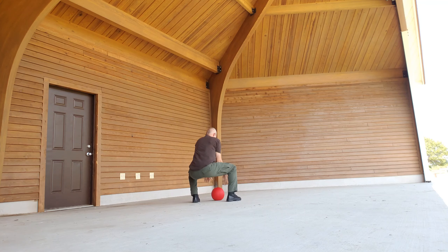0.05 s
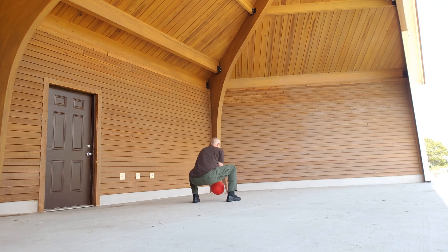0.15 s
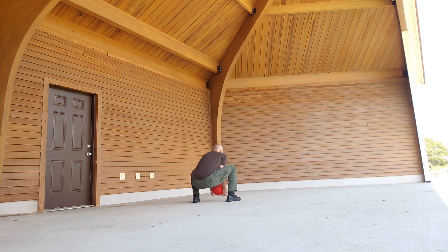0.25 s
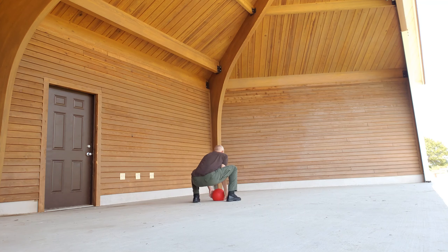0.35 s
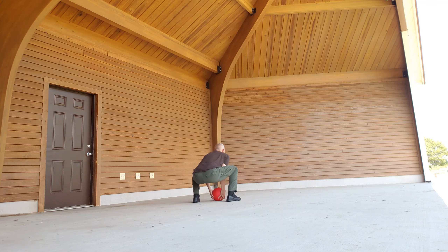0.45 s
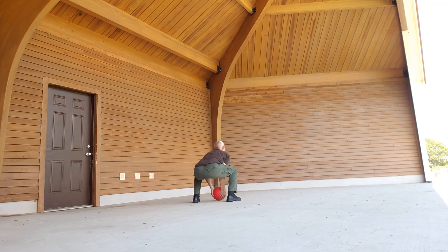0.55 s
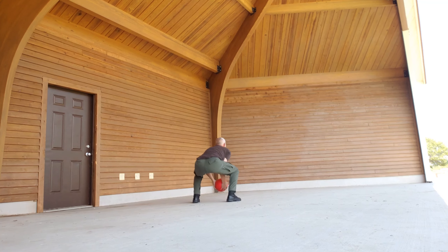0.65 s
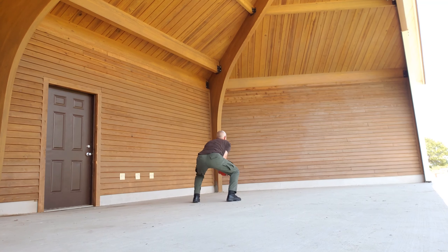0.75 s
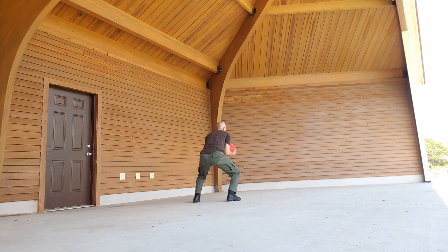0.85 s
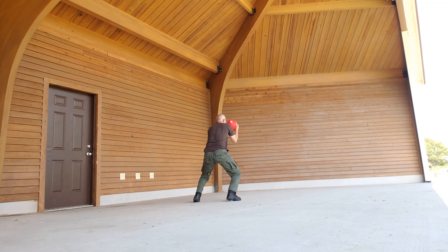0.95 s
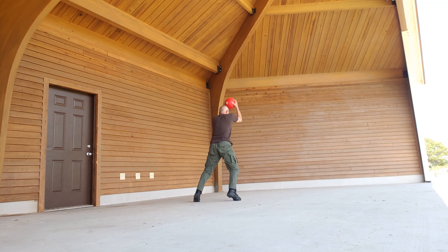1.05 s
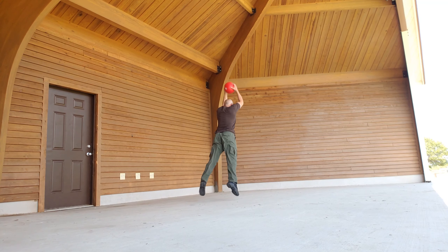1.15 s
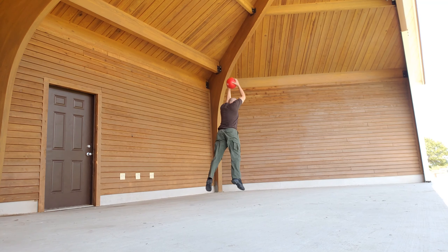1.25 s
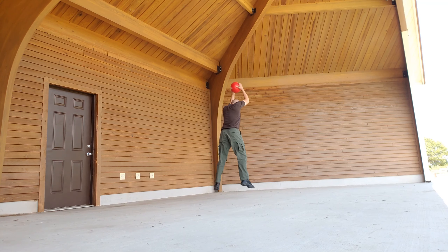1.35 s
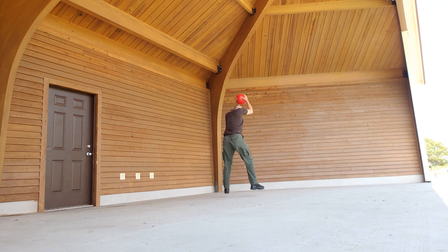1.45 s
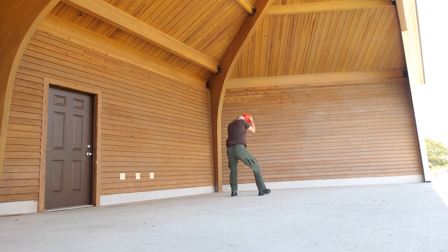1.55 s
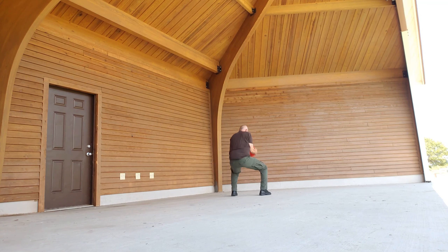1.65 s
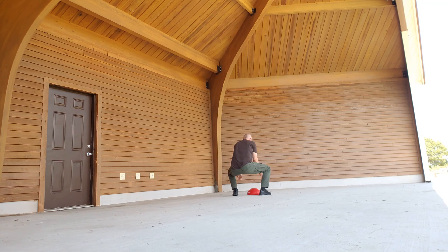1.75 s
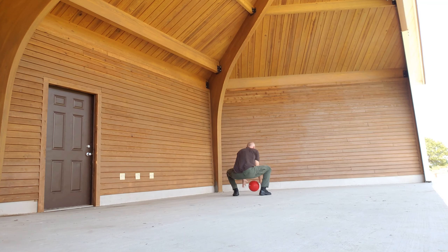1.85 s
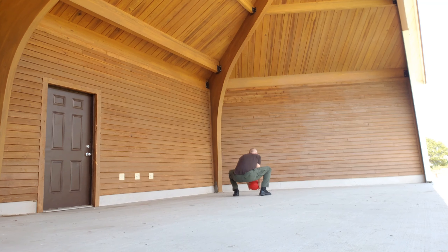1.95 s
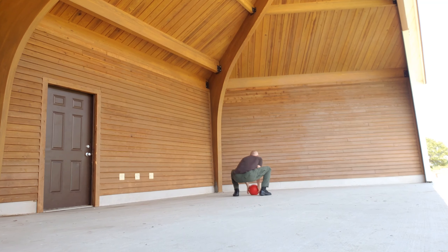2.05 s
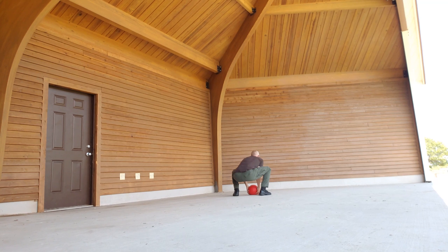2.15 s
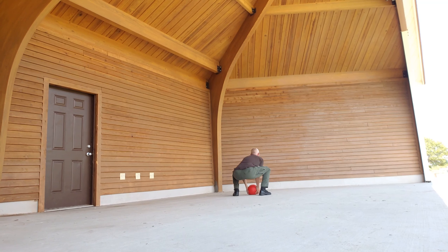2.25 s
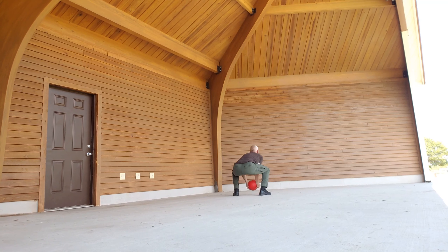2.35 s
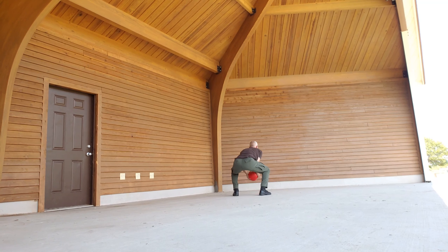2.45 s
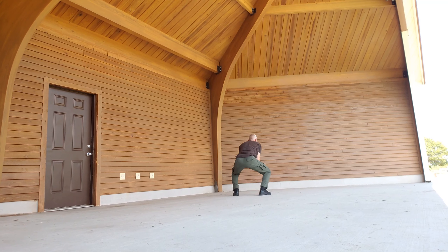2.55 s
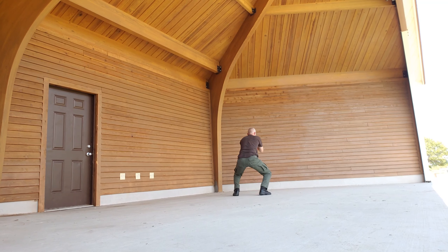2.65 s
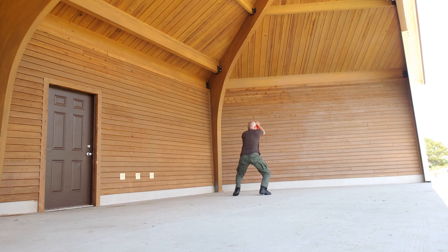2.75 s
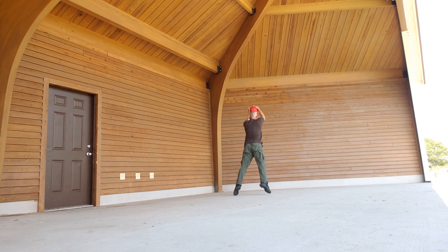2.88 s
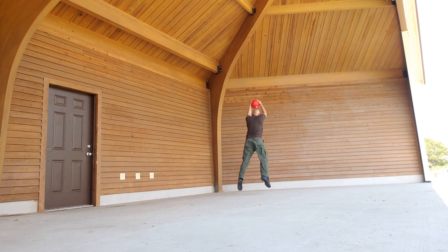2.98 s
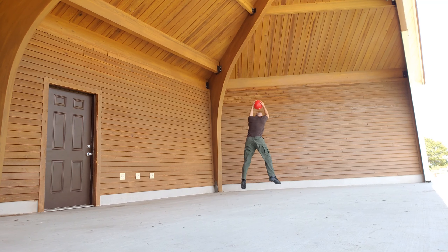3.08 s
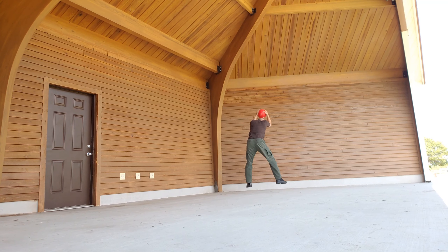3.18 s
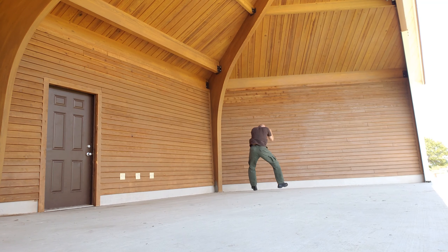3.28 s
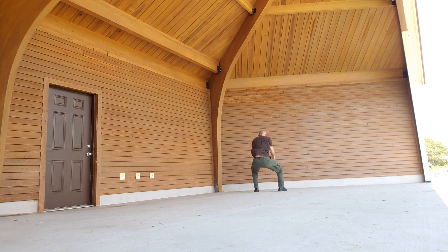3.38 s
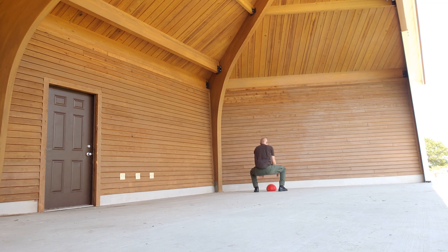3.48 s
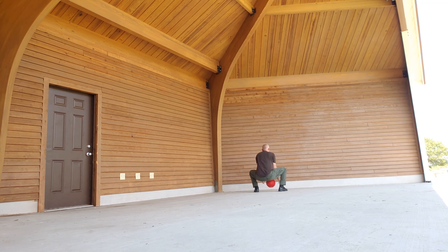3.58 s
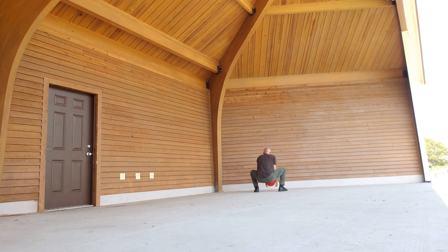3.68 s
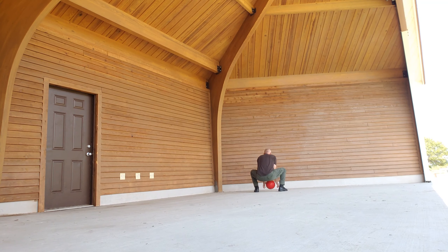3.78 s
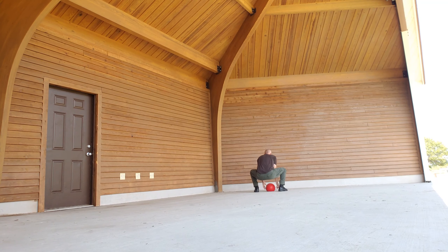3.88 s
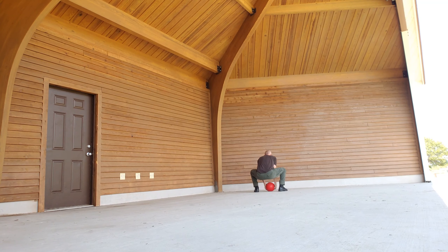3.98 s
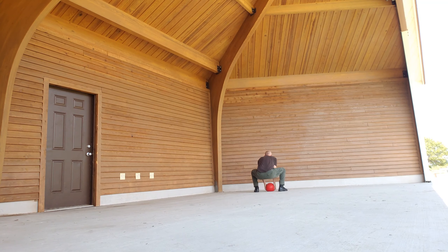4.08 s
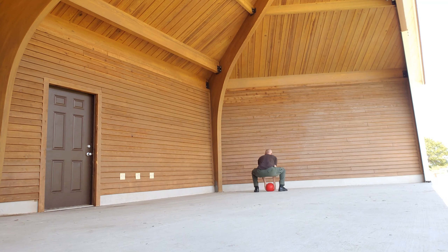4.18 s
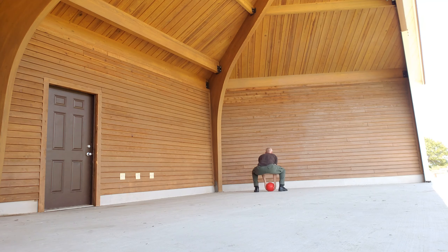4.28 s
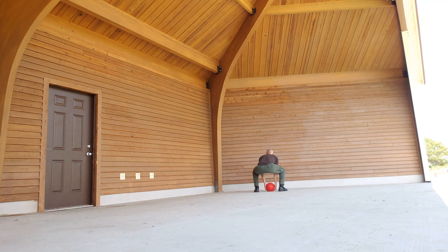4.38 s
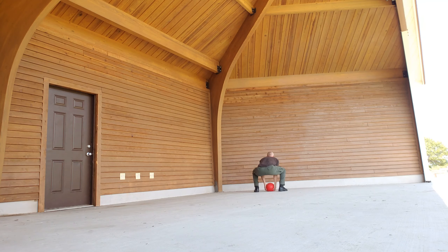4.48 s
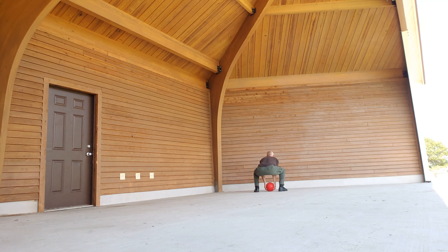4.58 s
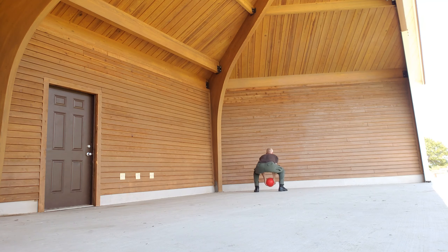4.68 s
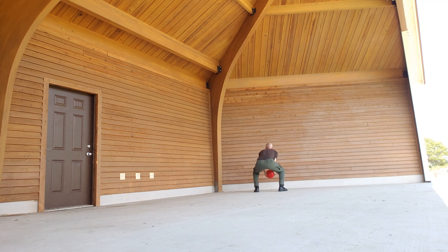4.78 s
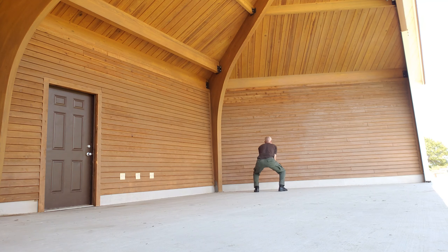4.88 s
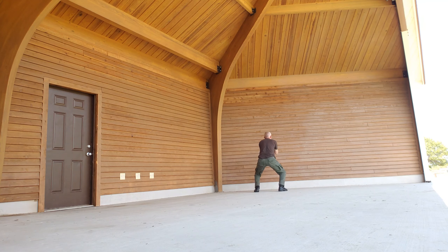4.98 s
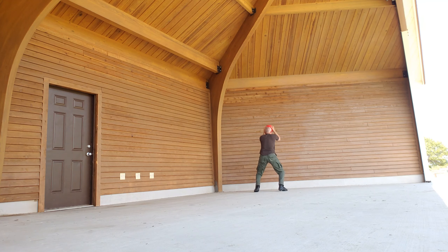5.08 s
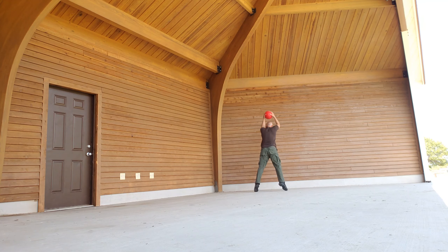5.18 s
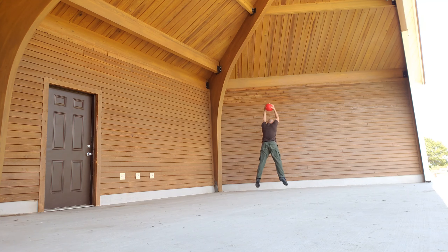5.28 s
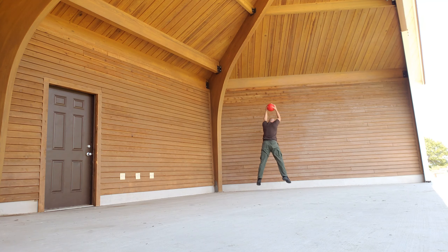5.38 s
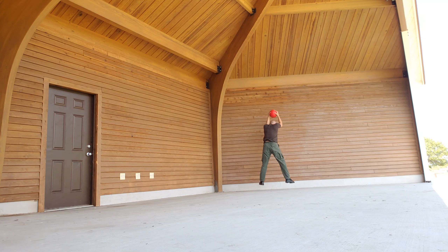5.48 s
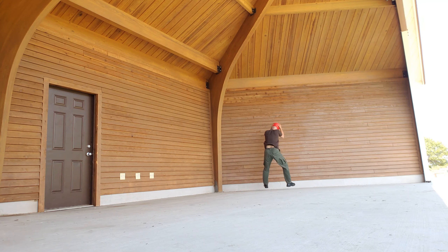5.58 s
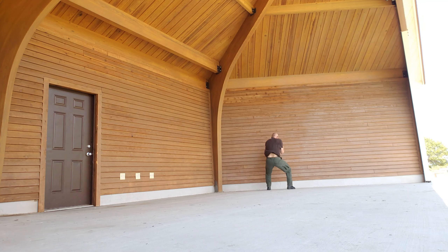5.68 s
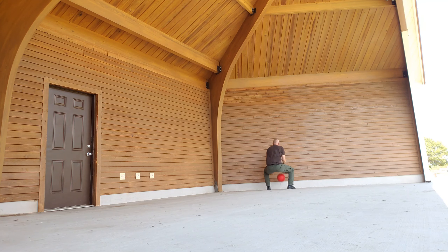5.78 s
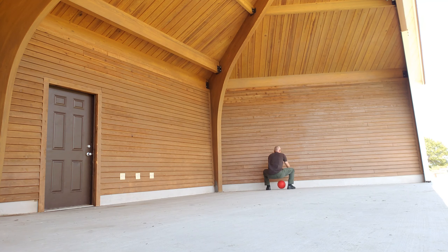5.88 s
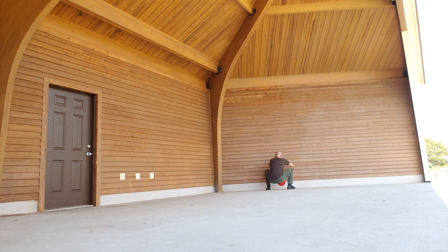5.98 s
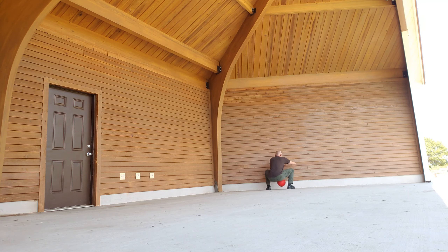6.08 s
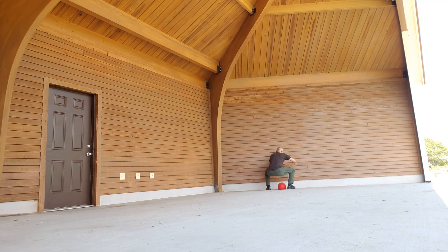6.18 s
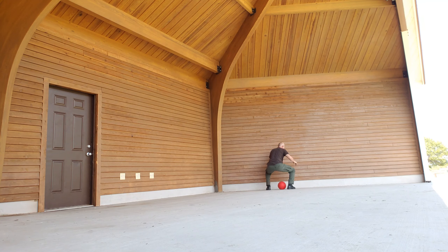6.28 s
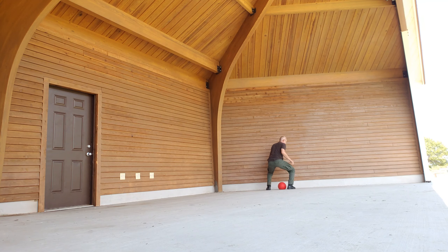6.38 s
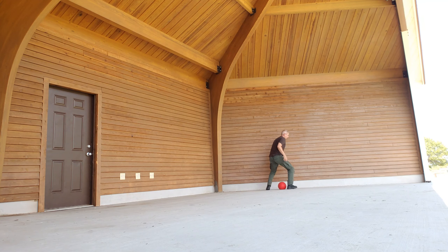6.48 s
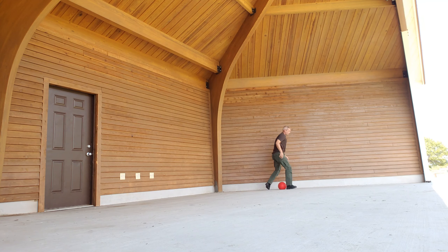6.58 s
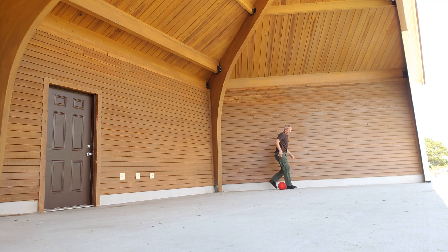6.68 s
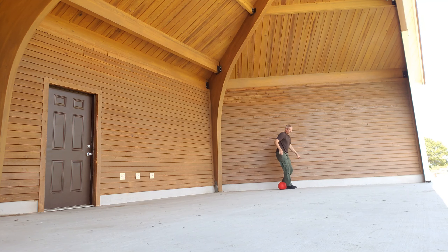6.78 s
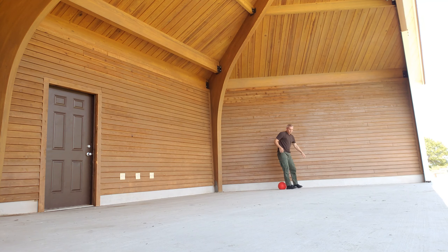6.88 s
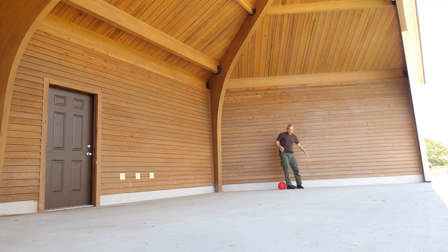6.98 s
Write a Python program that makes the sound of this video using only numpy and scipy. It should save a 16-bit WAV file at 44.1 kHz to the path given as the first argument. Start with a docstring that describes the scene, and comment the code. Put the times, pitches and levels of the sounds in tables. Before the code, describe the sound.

A heavy sand-filled ball is slammed onto concrete four times, with boots landing from jumps, echoing briefly in an open pavilion.

```python
"""A sand-filled ball is slammed four times on the concrete slab of an open wooden pavilion by someone
jumping in boots. Each blow reaches a listening point on the same slab first as a falling chirp of bending
waves in the concrete, then through the air, then by reflection from the walls and roof. The ball drops
back, soles and cloth rub and the sand runs. Behind are faint short chirps, perhaps distant birds, the
rumble of far traffic and the hiss of insects."""
import sys
import numpy as np
from scipy import signal
from scipy.fft import rfft, irfft, next_fast_len
from scipy.io import wavfile
from scipy.ndimage import map_coordinates

SR = 44100
rng = np.random.default_rng(int(sys.argv[2]) if len(sys.argv) > 2 else 0)


def master_out(mix):
    """Clip the mix to full scale and print it as 16-bit PCM to the path in sys.argv[1]."""
    frames = np.transpose(np.atleast_2d(mix))
    ceiling = np.clip(frames, -1, 1)
    pcm = np.round(ceiling * 32767).astype(np.int16)
    wavfile.write(sys.argv[1], SR, pcm)


N = 310419

# ball caught, or dropping back from its low bounce: start_s, level_db, treble_db, knock_hz
DROPS = [(.421, -30.5, -1, 2726), (1.995, -24, 4, 2874), (2.139, -20.5, -9, 870),
         (3.917, -30.5, -5.5, 2880), (6.254, -27.5, -2, 2320)]


def slams():
    """Impact excitation: the ball radiates a smack and sets the air under the roof and the slab ringing."""
    # airborne_arrival_s, level_db, bass_db, treble_db, corner_echo_db, distance_m
    hits = [(0.0888, 8.5, -6.5, -0.5, -4, 6.3), (1.832, 7.5, -6, 0, -1, 7.4), (3.5503, 9, -5.5, -4.5, 9, 6),
            (5.9088, 3, -9.5, 2, 11.5, 9.4)]
    # ball on concrete: frequency_hz, density_db
    spectrum = [(15, -41.5), (25, -12), (64, 1.5), (170, -6), (256, -15), (309, -18), (818, -28),
                (1040, -32.5), (2000, -32), (2410, -35.5), (2840, -35.5), (8830, -38.5), (11900, -34.5),
                (16000, -44.5)]
    sound_m_per_s = 343
    out = np.zeros((2, N))
    for s, db, bass_db, treble_db, corner_db, metres in hits:
        add(out, s, blow(spectrum, db, bass_db, treble_db, knock_hz=1980, knock_db=2.5,
                         contact_s=.0005, direct_db=3, corner_db=corner_db))
        add(out, s, air_modes(db + bass_db - 18.5))
        add(out, s - metres / sound_m_per_s, slab_wave(db + 16, metres))
    return out


def blow(spectrum, db, bass_db, treble_db, knock_hz, knock_db, contact_s,
         rise_s=1 / SR, direct_db=0, corner_db=0):
    """Contact gives a pressure pulse and a puff of air and grit; ribbed walls scatter each echo anew."""
    # early reflections: delay_s, level_db, left_minus_right_db
    walls = [(.0024, -4, 3.5), (.009, -6, -2), (0.011, -6, 2.5), (0.019, -5, 1.5), (0.026, -10, -4.5)]
    heard = pavilion(corner_db)
    t = np.arange(SR // 10) / SR
    for delay, path_db, pan_db in [(0.00024, direct_db, 0.0031)] + walls:
        puff = rng.standard_normal((2, len(t))) * np.exp(-t / contact_s)
        puff = signal.lfilter([1, -1], [1, -.95], puff / np.linalg.norm(puff[0]))  # high-pass
        puff[:, 0] += .6  # the pulse
        add(heard, delay, amp(path_db + pan_db * np.array([[.5], [-.5]])) * puff)
    heard *= 1 - np.exp(-(1 + np.arange(heard.shape[1])) / SR / rise_s)  # a soft contact fades in
    tilt = [(120, bass_db), (700, 0.005), (6000, treble_db)]
    knock = lambda hz: knock_db * np.exp(-(np.log((hz + 1) / knock_hz) / .16) ** 2)  # hollow rubber note
    colour = minimum_phase(lambda hz: along(spectrum, hz) + along(tilt, hz) + knock(hz))
    return amp(db) * signal.fftconvolve(heard, colour[None], axes=1)


def slab_wave(db, metres):
    """Dispersion: bending waves travel as the root of frequency, so a blow arrives as a falling chirp."""
    # transmission through the concrete: frequency_hz, gain_db
    slab = [(20, -16.5), (60, 5), (200, 4), (450, -4.5), (800, -20.5), (1500, -60.5), (3000, -120)]
    speed_at_1_hz = 13  # phase speed, m/s
    kick = np.zeros(SR // 4)
    kick[0] = amp(db)
    path = lambda hz, m: np.exp(-2j * np.pi * m * np.sqrt(hz) / speed_at_1_hz)
    edge_echo = lambda hz: -1.2 * path(hz, 1.3 * metres)
    return filtered(kick, lambda hz: amp(along(slab, hz)) * (path(hz, metres) + edge_echo(hz)))


def air_modes(db):
    """Normal modes: the air under the roof booms in damped sines whose strengths vary with each blow."""
    # frequency_hz, level_db, t60_s
    modes = [(59.4, -5, 0.63), (75.5, -3, 0.073), (112, 1, 0.23), (137, -5.5, 0.3), (255, -5, 0.19)]
    t = np.arange(SR // 2) / SR
    drive_db = lambda hz: along([(60, -2), (110, 0.0065)], hz) + rng.normal(0, 1.1)
    ring = sum(amp(level + drive_db(hz) - 60 * t / t60) * np.sin(2 * np.pi * hz * t)
               for hz, level, t60 in modes)
    return -amp(db) * ring * (1 - np.exp(-t / 0.0036))


def pavilion(corner_db, wet_db=9, build_s=0.0082, corner_s=0.018):
    """Reverberation builds up and decays band by band; the corner behind the player boosts its start."""
    # decay under the roof: frequency_hz, t60_s
    roof = [(50, 0.36), (120, 0.37), (400, 0.35), (1500, 0.3), (5000, 0.28), (12000, 0.26)]
    hz, t, bands = signal.stft(noise_pair(SR // 2), SR, nperseg=256)
    tail = signal.istft(bands * amp(-60 * t / along(roof, hz)[:, None]), SR, nperseg=256)[1]
    open_side = lambda hz: amp(along([(100, -3.0), (400, -2.5)], hz))  # long waves escape
    tail = filtered(tail, open_side)
    t = np.arange(tail.shape[1]) / SR
    tail *= amp(wet_db) * (1 - np.exp(-t / build_s)) / np.linalg.norm(tail[0])
    return tail * (1 + amp(corner_db) * np.exp(-(t / corner_s) ** 2))


def boots():
    """Impact of toe, then heel, after each jump: the slower the landing, the longer the contact."""
    # start_s, level_db, treble_db, rise_s
    landings = [(.001, -7, 7.5, 0.00042), (1.603, -24.5, -14, 0.002), (1.631, -4.5, -6, .0005),
                (3.419, -17.5, -12, 0.0081), (3.434, 0.5, -4.5, 0.0023), (3.444, -2.5, 0, 0.0011),
                (5.731, -16, -6.5, 0.006), (5.755, -1, -4.5, 0.0011)]
    # sole on concrete: frequency_hz, density_db
    spectrum = [(24, -34), (40, -9.5), (127, -5), (402, -15), (715, -13), (1300, -22.5), (1590, -20.5),
                (1950, -23.5), (2700, -25.5), (4930, -39.5), (16000, -53)]
    out = np.zeros((2, N))
    for s, db, treble_db, rise_s in landings:
        add(out, s, blow(spectrum, db, bass_db=-2, treble_db=treble_db, knock_hz=1680, knock_db=3,
                         contact_s=0.0017 + 0.7 * rise_s, rise_s=rise_s, corner_db=3.5))
    return out


def drops():
    """Soft impact: the ball, caught or dropping back, makes a long contact with a hollow resonance."""
    # frequency_hz, density_db
    spectrum = [(88, -38), (150, -9), (466, -8), (555, -14), (689, -13.5), (871, -14), (1600, -17.5),
                (11300, -28), (16000, -37)]
    out = np.zeros((2, N))
    for s, db, treble_db, knock_hz in DROPS:
        add(out, s, blow(spectrum, db, bass_db=-2.5, treble_db=treble_db, knock_hz=knock_hz,
                         knock_db=3.5, contact_s=.01, rise_s=0.0028, corner_db=-6.5))
    return out


def rubbing():
    """Sliding friction: soles and cloth make bright and dull noise that flutters as the grip slips."""
    # peak_s, level_db, dull_part_db, rise_s
    scuffs = [(1.101, -72.5, 1.5, 0.039), (1.171, -71, 2, 0.026), (1.29, -78, 12.5, 0.04),
              (1.985, -57, -10, 0.03), (2.732, -72, -25, 0.03), (2.827, -68.5, -18.5, .015),
              (2.891, -55, -17, 0.027), (2.971, -65.5, 1, 0.035), (3.988, -71.5, 5, 0.045),
              (4.78, -78, -4, 0.033), (5.26, -67, -3, 0.033), (5.34, -77.5, -14, 0.019),
              (6.58, -73, 8, 0.041), (6.635, -57.5, -1, 0.025), (7.03, -70.5, 17.5, 0.008)]
    # soles sliding on after a landing: peak_s, level_db
    slides = [(1.65, -59), (3.46, -54), (5.768, -55)]
    # bright and dull friction spectra: frequency_hz, density_db
    rub = [(290, -38), (500, -10.5), (1190, -15.5), (1950, -15.5), (2810, -16.5), (4800, -18.5),
           (14700, -16), (16000, -15)]
    leather = [(200, 5), (450, 9.5), (900, 5.5), (1500, -11), (2200, -14), (4000, -58.5)]
    slide_dull_db = -4
    strokes = [(amp(db) * swell(s, rise, 1.1 * rise), dull_db) for s, db, dull_db, rise in scuffs]
    strokes += [(amp(db) * swell(s, rise_s=.015, fall_s=0.1), slide_dull_db) for s, db in slides]
    bright = sum(stroke for stroke, _ in strokes)
    dull = sum(amp(dull_db) * stroke for stroke, dull_db in strokes)
    flutter = amp(0.6 * wobble(80))
    return flutter * (bright * noise(rub) + dull * noise(leather))


def sand():
    """Granular flow: the filling hisses as it shifts in the ball and as it settles after every drop."""
    # ball swung, bouncing or lifted: peak_s, level_db, rise_s
    shifts = [(0.3, -61, 0.054), (.62, -67.5, 0.18), (1.791, -60.5, 0.05), (2.38, -66, .13),
              (3.748, -71, 0.06), (5.874, -49.5, 0.022), (6.1, -68, .035)]
    # colliding grains: frequency_hz, density_db
    grit = [(3000, -38), (5500, -8.5), (7500, -6.5), (11000, -3), (16000, -1)]
    moving = sum(amp(db) * swell(s, rise, 0.83 * rise) for s, db, rise in shifts)
    settling = sum(amp(db - 32) * swell(s + .025, rise_s=.022, fall_s=.0374) for s, db, *_ in DROPS)
    return (moving + settling) * noise(grit)


def faint_chirps():
    """Random amplitude modulation spreads each short tone, perhaps a distant bird, into a narrow band."""
    # peak_s, pitch_hz, level_db
    tones = [(1.2, 479, -57), (1.28, 1780, -73), (1.29, 499, -65), (2.895, 2750, -63), (3.981, 1400, -60),
             (4.083, 1560, -71.5), (4.467, 1402, -80), (4.71, 1480, -77), (5.27, 2780, -74.5),
             (6.605, 1270, -59.5)]
    t = np.arange(N) / SR
    out = np.zeros((2, N))
    for s, hz, db in tones:
        envelope = amp(db) * swell(s, rise_s=0.034, fall_s=0.032)
        fuzz = np.array([wobble(470), wobble(300)])
        out += envelope * np.sin(2 * np.pi * hz * t) * fuzz
    return out


def traffic():
    """Slowly modulated low-frequency noise: far traffic rumbles in lumps beneath a weaker drone."""
    # time_s, rumble_db, drone_db
    levels = [(0, -49.5, -57.5), (1.2, -48.5, -61.5), (3.3, -48, -59.5), (4.899, -49.5, -64.5),
              (5.7, -50.5, -62.5), (6.2, -44.5, -60.5), (7.04, -47, -59.5)]
    # both spectra: frequency_hz, density_db
    rumble_spectrum = [(12, -62), (20, -27.5), (46, 1.5), (70, 1.5), (130, -8.5), (162, -27), (250, -24.5),
                       (320, -38.5), (550, -120)]
    drone_spectrum = [(88, -43.5), (150, -8.5), (240, -9), (300, -18), (646, -30), (1420, -39.5),
                      (2500, -53), (3250, -83), (5500, -120)]
    s, rumble_db, drone_db = np.transpose(levels)
    t = np.arange(N) / SR
    rumble = amp(np.interp(t, s, rumble_db) + 1.5 * wobble(7)) * noise(rumble_spectrum)
    drone = amp(np.interp(t, s, drone_db) + 0.27 * wobble(9)) * noise(drone_spectrum)
    return rumble + drone


def insects():
    """Narrow-band noise: the hiss of far insects near 7.5 kHz comes and goes."""
    # time_s, level_db
    levels = [(0, -91.5), (0.9, -86.5), (1.4, -94), (2.4, -85.5), (3.201, -85), (4.45, -95), (4.75, -84),
              (5, -99.5), (5.3, -82), (5.6, -95), (7.04, -96.5)]
    # frequency_hz, density_db
    wings = [(5000, -58), (6500, -8), (7500, 1.5), (8300, -11), (10000, -61.5)]
    s, db = np.transpose(levels)
    return amp(np.interp(np.arange(N) / SR, s, db)) * noise(wings)


def noise_pair(size):
    """Spatial coherence: white noise at two close points agrees in the bass, where waves are long."""
    # frequency_hz, left_right_correlation
    coherence = [(60, .93), (130, .87), (290, 0.86), (640, 0.69), (1400, -0.1), (4000, 0.065),
                 (15000, -0.43)]
    angle = lambda hz: np.arccos(np.clip(along(coherence, hz), -1, 1)) / 2
    weights = lambda hz: np.array([np.cos(angle(hz)), np.sin(angle(hz))])
    mid, side = filtered(rng.standard_normal((2, size)), weights)
    return np.array([mid + side, mid - side])


def noise(spectrum):
    """Stationary stereo noise of rms 1, shaped by (frequency_hz, density_db) points."""
    x = filtered(noise_pair(N), lambda hz: amp(along(spectrum, hz)))
    return x / np.std(x)


def wobble(knots_per_s):
    """Smooth random modulation: a spline through Gaussian knots."""
    knots = rng.standard_normal(int(N * knots_per_s / SR) + 4)
    return map_coordinates(knots, [np.arange(N) * knots_per_s / SR])


def swell(peak_s, rise_s, fall_s):
    """Envelope with a Gaussian rise and a fall that turns exponential, like reverberation."""
    t = np.arange(N, dtype=np.float32) / SR - peak_s
    return np.where(t < 0, np.exp(-(t / rise_s) ** 2), 1 / np.cosh(np.clip(t / fall_s, 0, 50)))


def minimum_phase(colour_db):
    """Causal impulse response of energy 1, made by folding the cepstrum of a magnitude spectrum."""
    magnitude = amp(colour_db(np.fft.rfftfreq(8192, 1 / SR)))
    cepstrum = irfft(np.log(magnitude + 1e-6))
    cepstrum[1:4096] *= 2
    cepstrum[4097:] = 0
    impulse = irfft(np.exp(rfft(cepstrum)))
    return impulse / np.linalg.norm(impulse)


def filtered(x, response):
    """Linear filtering: the spectrum of x times a complex frequency response."""
    size = next_fast_len(x.shape[-1] + 8192)
    return irfft(rfft(x, size) * response(np.fft.rfftfreq(size, 1 / SR)), size)[..., :x.shape[-1]]


def along(points, hz):
    """Interpolation of (frequency_hz, value) points on a logarithmic frequency axis."""
    knots_hz, values = np.transpose(points)
    return np.interp(np.log(hz + 1), np.log(knots_hz + 1), values)


def amp(db):
    """Decibels as an amplitude ratio."""
    return 10 ** (np.asarray(db) / 20)


def add(out, start_s, x):
    """Superposes x on out from start_s."""
    part = out[:, round(start_s * SR):][:, :x.shape[-1]]
    part += x[..., :part.shape[1]]


def scene():
    """Superposition: the pressures of all sources add."""
    return slams() + boots() + drops() + rubbing() + faint_chirps() + sand() + traffic() + insects()


def record(dry, hiss_db=-80, ceiling=.95, top_hz=16000):
    """Transduction: two unequal microphones add self-noise, saturate on peaks and limit the band."""
    # self-noise: frequency_hz, density_db
    hiss = [(900, -29.5), (1500, -8.5), (2700, -5), (5500, -12), (9000, -13.5), (12000, -2.5),
            (15200, -4.5), (16400, -13.5)]
    # frequency_hz, left_minus_right_db
    imbalance = [(60, -0.03), (300, -2.5), (1000, -1.5), (4000, 1.5), (8000, 5), (14000, -1)]
    sides = np.array([[.5], [-.5]])
    x = filtered(dry + amp(hiss_db) * noise(hiss), lambda hz: amp(sides * along(imbalance, hz)))
    x = x / (1 + np.abs(x / ceiling) ** 4) ** (1 / 4)
    return filtered(x, lambda hz: hz < top_hz)


dry = scene()
out = record(dry)
master_out(out)
```